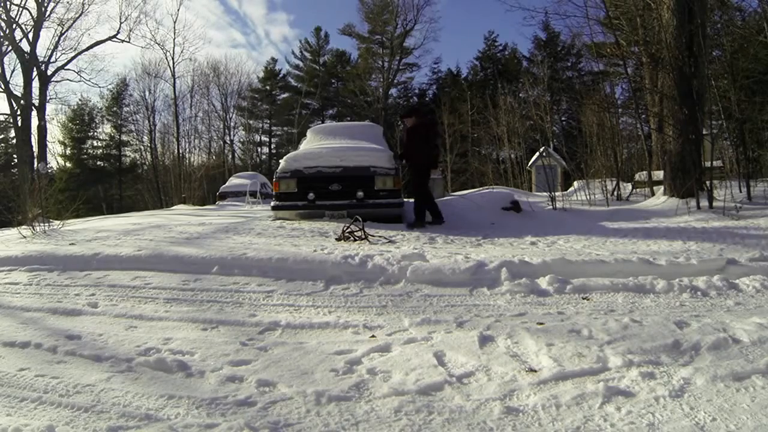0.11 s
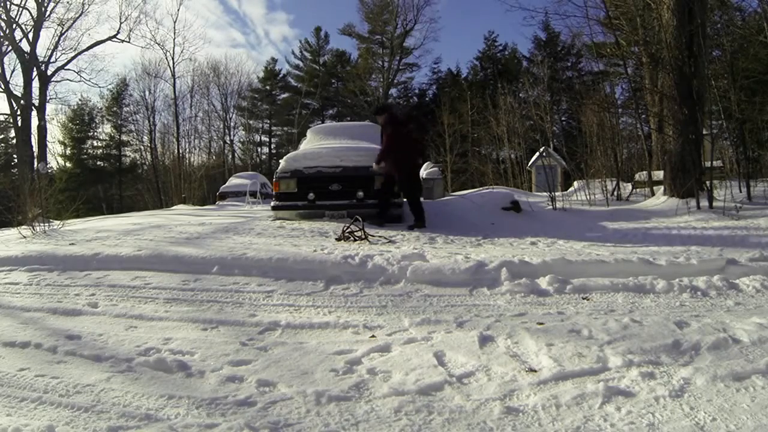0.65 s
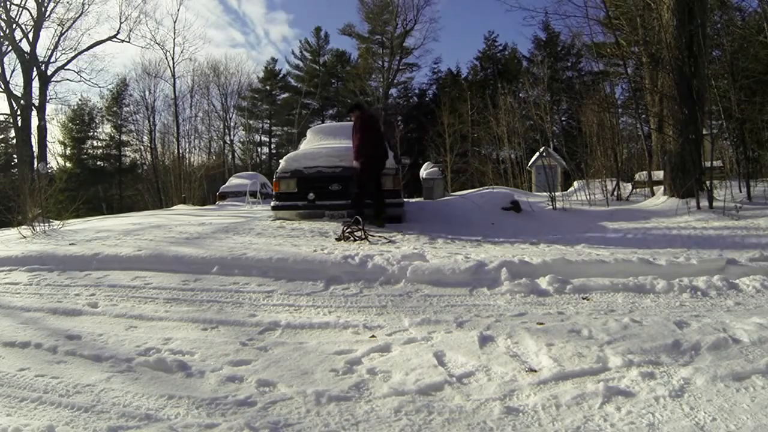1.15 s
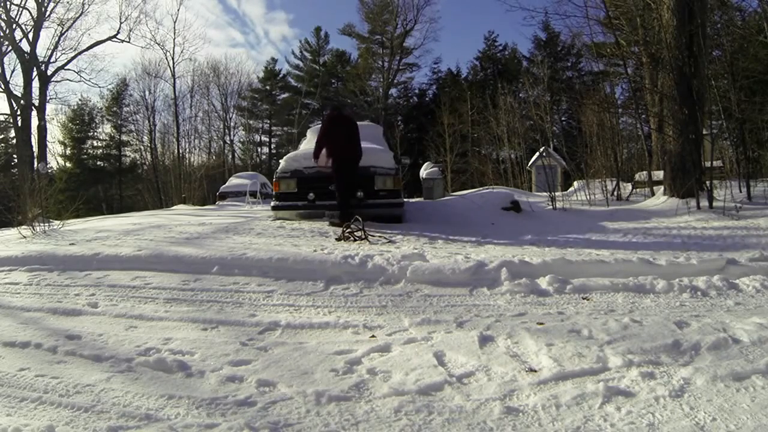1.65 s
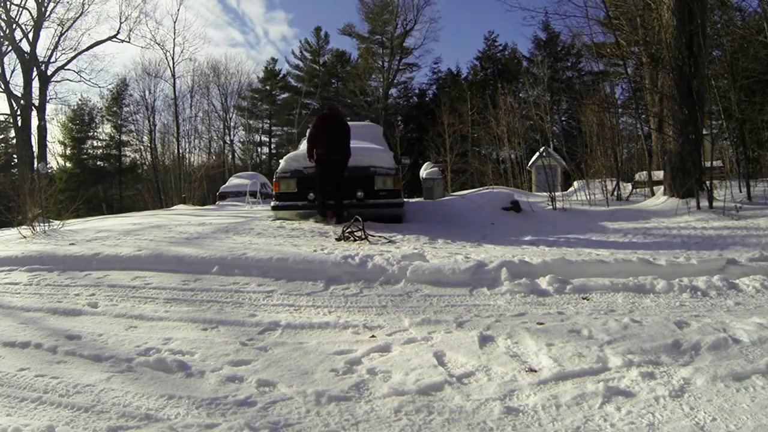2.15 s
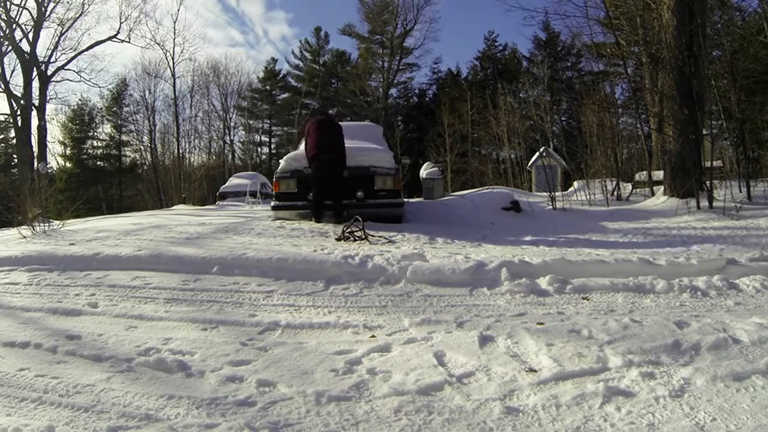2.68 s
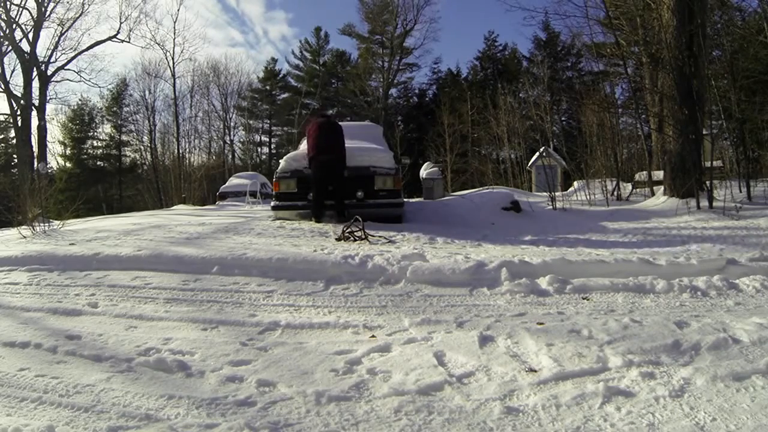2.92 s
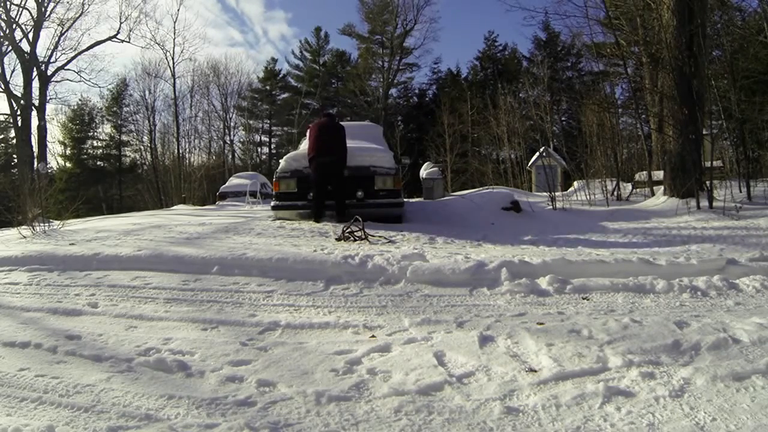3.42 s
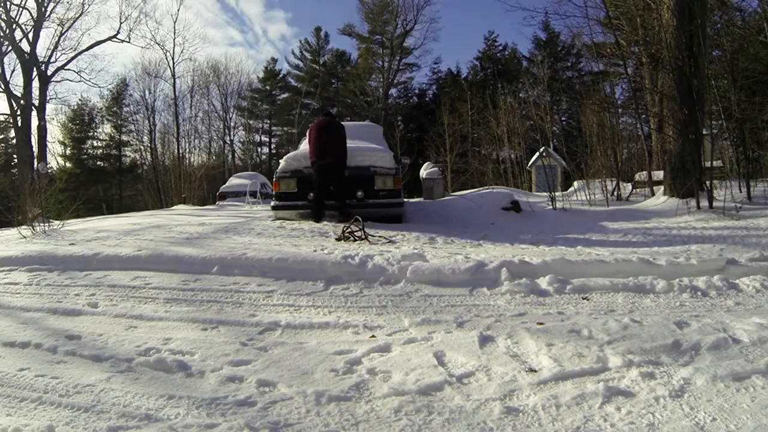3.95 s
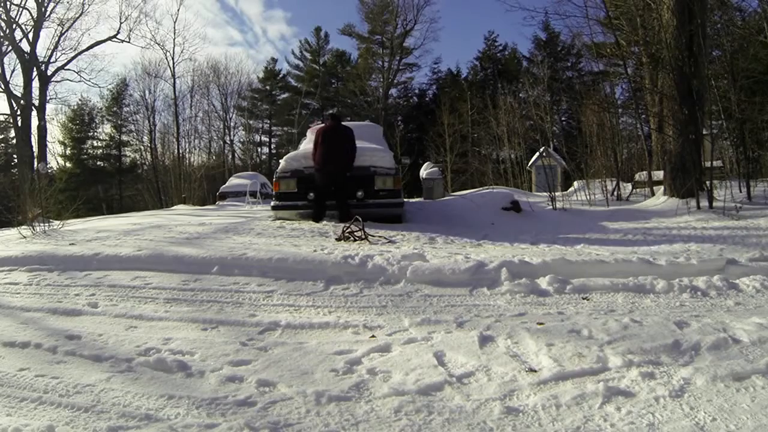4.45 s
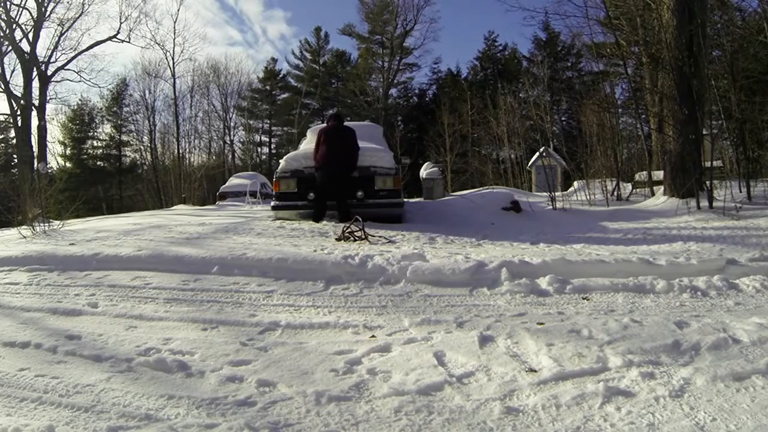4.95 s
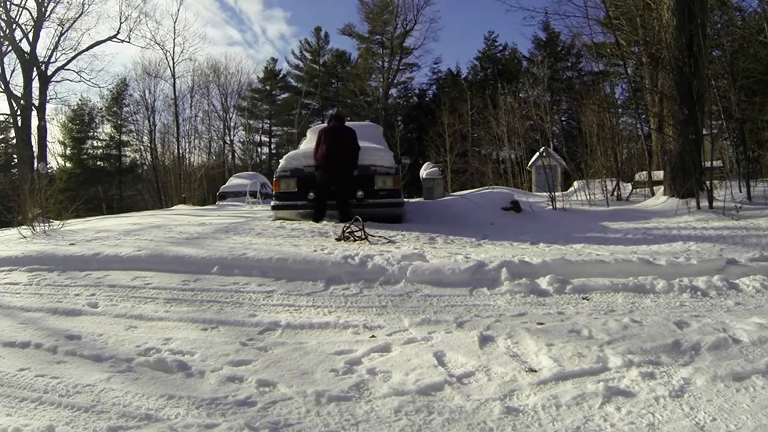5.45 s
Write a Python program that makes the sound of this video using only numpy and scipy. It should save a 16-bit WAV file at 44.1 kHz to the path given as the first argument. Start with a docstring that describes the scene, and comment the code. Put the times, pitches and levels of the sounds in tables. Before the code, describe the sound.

A quiet outdoor yard, dry and without echo, in mono. Light wind rumbles unsteadily on the microphone over soft hiss and a very faint high whine. From 0 to 0.9 s someone shuffles in cold snow, with grainy crunches, small muffled knocks and a soft metallic clink around 0.5 s. It nearly quiets at about 1 s, and soft steps resume around 1.3 s. At 1.7 s a sharp crust crack snaps out, followed by more brittle cracks at 2.0 and 2.2 s and a low footfall boom near 2.4 s. From 2.7 to 3.4 s the treading is densest, with creaky groaning and deep hollow thuds, strongest near 3.3 s. Another crunch spreads from 3.8 to 4.4 s, then a brief lull. Short crackling presses follow from 4.8 s, with a faint metal ring near 5.0 s. A heavy step at 5.45 s brings a low boom and tiny high squeak, its crunch continuing to the end as wind swells.

```python
"""Someone treads and shuffles in cold, dry snow across a quiet yard: crystals break in dense random showers.
The packed snow groans and thuds as slips and collapses ring a few hollow resonances; crusts crack
as bursts of splinters with a ring; two heavy footfalls boom as low sines and a sole squeaks once.
A carried metal thing rings faintly in decaying modes.
Light wind, shaped noise, rumbles on the microphone over its own hiss and a thin whine."""
import sys
import numpy as np
from scipy import signal
from scipy.fft import rfft, irfft
from scipy.io import wavfile
from scipy.ndimage import uniform_filter1d

SR = 44100
rng = np.random.default_rng(int(sys.argv[2]) if len(sys.argv) > 2 else 0)


def unload_wav(signal):
    """Save mono or channel-first audio to the path in sys.argv[1] as 16-bit WAV at rate SR, clipped to [-1, 1]."""
    wavfile.write(
        sys.argv[1],
        SR,
        np.round(np.clip(np.atleast_2d(signal).T, -1, 1) * 32767).astype(np.int16),
    )


def gain_from_decibels(decibels):
    """Convert decibel values to linear amplitude factors."""
    exponent = np.asarray(decibels, float) / 20
    return 10 ** exponent


N = 246519
T = np.arange(N) / SR

# spectrum of breaking crystals: (f/Hz, relative density/dB per Hz)
CRYSTAL_SPECTRUM = [(500, -7), (800, 0.5), (1400, -0.5), (3700, -6.5), (6200, -12.5), (9000, -19),
                    (12700, -21.5), (15000, -27.5)]
# snow underfoot along the way: (t/s, finest crystals over the coarse/dB,
# deep groan over the middle/dB, upper groan over the middle/dB)
SNOW_UNDERFOOT = [(0, -12, -4.5, -6.5), (0.4, -15, -1, -2.5), (0.63, -7.5, -3, 1), (0.75, -9, -4.5, -7.5),
                  (1.3, -12.5, -2.5, -3.5), (1.7, -7.5, 2, -7), (2.2, -11.5, 3.5, 0), (2.6, -8, 9, 1.5),
                  (3.1, -8.5, 9, 1), (3.4, -10.5, 7, 0.5), (3.7, -18, -3, -11), (3.9, -7.5, 4, -0.5),
                  (4.2, -9.5, 3, -3), (4.35, -10.5, -7, -11), (4.8, -7.5, -2, -2), (5.1, -11, 5, -2.5),
                  (5.587, -7.5, -2.5, -5)]


def curves(table):
    """Columns of a table after the time, interpolated at every sample."""
    s, *columns = np.transpose(table)
    return [np.interp(T, s, column) for column in columns]


def unit(x):
    """Scale to rms 1."""
    return x / np.sqrt(np.mean(x ** 2))


def colour(x, points):
    """Filter x by a curve of (f/Hz, gain/dB) points, joined on a log frequency axis, and scale to rms 1."""
    hz, db = np.transpose(points)
    f = np.maximum(np.arange(N // 2 + 1) * SR / N, 1)
    gain = gain_from_decibels(np.interp(np.log(f), np.log(hz), db))
    return unit(irfft(rfft(x) * gain, N))


def band(x, hz, width):
    """Two-pole resonance, gain 1 at the centre; width in Hz."""
    return signal.lfilter(*signal.iirpeak(hz, hz / width, fs=SR), x)


def fade(t, t60):
    """Decay by 60 dB in t60 seconds."""
    return np.exp(-np.log(1000) * t / t60)


def add(out, s, x):
    """Mix x into out from time s in seconds, cut at the end of the scene."""
    start = int(s * SR)
    out[start:start + len(x)] += x[:N - start]


def walk(rate):
    """Wandering control signal of rms 1: rate random targets a second, joined by straight slopes."""
    hold = int(SR / rate)
    targets = rng.standard_normal(N // hold + 1)
    return unit(uniform_filter1d(np.repeat(targets, hold), hold)[:N])


def grains(rate, spread_db):
    """Random clicks, rate a second on average; sizes spread exponentially in dB, so a few stand out."""
    when, size, sign = rng.random(N), rng.exponential(size=N), rng.choice([-1, 1], N)
    return (when < rate / SR) * sign * gain_from_decibels(spread_db * np.minimum(size, 4))


def microphone():
    """Wind rumble as low noise of varying level, steady hiss and a thin electric whine."""
    # wind on the microphone: (t/s, level/dB)
    wind_level = [(0, -56), (0.2, -55.5), (0.45, -64), (0.72, -54), (1.15, -68), (1.4, -55.5), (1.6, -64.5),
                  (1.85, -55.5), (2.22, -63), (2.47, -49), (2.62, -61), (2.9, -56), (3.28, -54),
                  (3.5, -64.5), (3.85, -60.5), (3.97, -50.5), (4.2, -52.5), (4.6, -66), (4.82, -56.5),
                  (5.15, -66), (5.5, -44), (5.587, -48)]
    # spectrum of the wind rumble: (f/Hz, relative density/dB per Hz)
    gust_spectrum = [(12, -33), (25, 4), (48, 0), (85, -1), (125, -4.5), (300, -87)]
    # spectrum of the hiss: (f/Hz, relative density/dB per Hz)
    hiss_spectrum = [(90, -28), (140, 5.5), (400, -4.5), (1200, -6.5), (4500, -15), (8000, -18),
                     (13000, -25), (15200, -24)]
    hiss_db = -65.5
    whine_hz, whine_db = 14745, -88
    wind = gain_from_decibels(curves(wind_level)[0]) * colour(rng.standard_normal(N), gust_spectrum)
    hiss = gain_from_decibels(hiss_db) * colour(rng.standard_normal(N), hiss_spectrum)
    whine = gain_from_decibels(whine_db) * np.sin(2 * np.pi * whine_hz * T)
    return wind + hiss + whine


def clinks():
    """Every soft knock rings the same metal modes, a little differently; the ring wavers as the thing swings."""
    # metal knocked: (t/s, base level of the modes/dB, extra on the lowest mode/dB)
    knocks = [(0.526, -42.5, 8), (0.9155, -58.5, -11), (4.9752, -46, 12)]
    # modes of the metal: (f/Hz, level relative to the knock/dB, t60/s)
    metal_modes = [(638, -10, 0.21), (1077, -13.5, 0.96), (1360, -15, 0.64), (1450, -17, 0.19),
                   (1505, -13, 0.48), (1520, -8, 0.51), (1760, -10, 0.53)]
    t, out = T[:SR], np.zeros(N)
    onset = np.minimum(t / 0.0026, 1)  # 2.6 ms ramp: the knock is soft
    scatter_db = 2.5 * rng.standard_normal((len(knocks), len(metal_modes)))
    for (s, db, low_db), scatter in zip(knocks, scatter_db):
        for k, (hz, mode_db, t60) in enumerate(metal_modes):
            gain = gain_from_decibels(db + mode_db + scatter[k] + low_db * (k == 0))
            add(out, s, gain * onset * np.sin(2 * np.pi * hz * t) * fade(t, t60))
    waver = gain_from_decibels(1.5 * walk(40))
    return out * waver


def squeak():
    """A short, near-pure whistle of the sole, throbbing as it sticks and slips."""
    centre_s, spread_s = 5.4645, 0.0096  # Gaussian swell
    whistle_hz, throb_hz = 4520, 31  # the throb is a sine multiplier, so the loudness peaks twice per cycle
    level_db = -31.5  # before swell and throb
    t = T - centre_s
    swell = np.exp(-.5 * (t / spread_s) ** 2)
    throb = np.sin(2 * np.pi * throb_hz * t)
    return gain_from_decibels(level_db) * swell * throb * np.sin(2 * np.pi * whistle_hz * t)


def stamp():
    """The ground booms under a heavy foot: a low, decaying sine."""
    # heavy footfalls: (t/s, starting level/dB, f/Hz, t60/s)
    footfalls = [(2.363, -33, 76.2, 0.34), (5.446, -34, 81.6, 0.2)]
    t, out = T[:SR], np.zeros(N)
    for s, db, hz, t60 in footfalls:
        add(out, s, gain_from_decibels(db) * np.sin(2 * np.pi * hz * t) * fade(t, t60))
    return out


def hollow(push):
    """The packed snow rings in three groups of resonances: deep, middle, upper."""
    # three groups of resonances, each a list of: (f/Hz, width/Hz, relative level/dB)
    hollow_groups = [
        [(207.6, 77, 1.5), (242.8, 27, -9.5)],
        [(404, 125, 7), (477, 126, -7)],
        [(655, 64.5, 9.5), (804, 116, 3)],
    ]
    rings = []
    for group in hollow_groups:
        ring = 0
        for hz, width, db in group:
            steep = band(band(push, hz, width), hz, width)  # two passes steepen the sides
            ring = ring + gain_from_decibels(db) * steep / np.sqrt(width)  # evens out wide and narrow resonances
        rings.append(ring)
    return rings


def thuds():
    """Sudden collapses of the packed snow strike its hollows with single blows."""
    # collapses: (t/s, deep peak/dB, middle peak/dB, upper peak/dB)
    collapses = [(0.08, -43, -34, -48), (0.143, -46, -39, -42), (0.202, -44, -34.5, -36),
                 (0.314, -59, -42.5, -50), (0.371, -57, -48, -44.5), (0.664, -50, -40, -47),
                 (0.719, -49, -42, -44), (0.833, -44, -39.5, -37), (0.846, -39, -36, -38.5),
                 (1.212, -59, -54, -63), (1.43, -55, -51, -48), (1.596, -58, -49, -40),
                 (1.662, -47, -50, -50), (1.772, -36.5, -47, -40), (1.838, -36, -46, -55),
                 (1.897, -42, -40, -64), (1.955, -42, -46, -53), (2.199, -61, -51, -38),
                 (2.329, -34.5, -43, -45), (2.418, -45, -41.5, -54), (2.542, -37, -44, -45.5),
                 (2.699, -32, -43, -50), (2.75, -33.5, -39.5, -46), (2.789, -37, -40, -56),
                 (2.831, -32.5, -41, -57), (3.045, -31, -40, -42), (3.077, -25.5, -36.5, -36),
                 (3.172, -33, -50, -34), (3.229, -44, -61, -31.5), (3.257, -22, -39, -35),
                 (3.277, -22.5, -54, -32.5), (3.371, -39, -38, -43), (3.462, -41, -45, -49),
                 (3.599, -45.5, -42, -57), (3.775, -46, -39, -54), (3.815, -43, -41.5, -49),
                 (3.844, -40, -45, -41), (3.943, -30.5, -55, -50), (3.964, -33.5, -47, -40.5),
                 (4.269, -38, -30.5, -40), (4.404, -56, -37, -45.5), (4.594, -50.5, -52, -60),
                 (4.693, -48.5, -47, -54), (4.786, -52, -35, -50), (5.224, -58, -42, -63.5)]
    blow = np.zeros(SR // 8)
    blow[0] = 1
    rings = np.array([ring / np.abs(ring).max() for ring in hollow(blow)])
    out = np.zeros(N)
    for s, *db in collapses:
        add(out, s, gain_from_decibels(np.array(db)) @ rings)
    return out


def cracks():
    """The crust cracks in a burst of splinters; the breaking slab rings at its own pitch."""
    # crust cracking: (t/s, nominal peak of the splinters/dB, pitch of the ring/Hz, ring over splinters/dB)
    crust_breaks = [(0.2118, -33, 960, 5), (0.377, -36, 1180, -7), (0.4292, -33.5, 802, -3),
                    (0.522, -41, 1450, 3), (0.623, -36.5, 840, 7), (0.704, -38, 830, 7),
                    (0.838, -34, 800, -9), (1.6516, -45, 1450, -15), (1.731, -16.5, 2040, -9),
                    (1.7675, -23, 900, -3), (1.902, -40, 834, -10), (2.0312, -23, 1023, 1),
                    (2.204, -19, 1030, -7), (2.269, -30, 3700, -2), (2.318, -33.5, 1460, 11),
                    (2.3594, -23, 1570, 6), (2.541, -41, 780, -3), (2.624, -41.5, 810, 9),
                    (2.8724, -21, 876, 6), (2.937, -33.5, 1040, 2), (3.048, -25.5, 780, 2),
                    (3.2786, -29, 960, -1), (3.3722, -25.5, 975, -3), (3.7776, -37, 845, -6),
                    (3.8469, -22, 820, 3), (4.292, -29.5, 2880, 5), (4.31, -36, 1450, 13),
                    (4.331, -38, 1455, 13), (4.351, -37, 1450, 11), (4.782, -35, 1450, -15),
                    (4.859, -37.5, 3350, 9.5), (4.872, -40, 1490, 10), (4.8854, -39, 1490, 10),
                    (4.954, -35, 1450, -10), (4.9773, -40, 1450, -8), (5.0517, -36, 1410, -12),
                    (5.0751, -42, 1440, 13), (5.4894, -31, 1060, 6)]
    crest_db = 14.5  # how far the peak of a burst of splinters stands above its rms
    t60_s = 0.077
    t, out = T[:SR // 8], np.zeros(N)
    splinters = colour(grains(12000, 2.8), CRYSTAL_SPECTRUM)
    for s, db, hz, ring_db in crust_breaks:
        burst = splinters[int(s * SR):][:len(t)]
        width = 0.073 * hz
        ring = unit(band(band(burst, hz, width), hz, width))
        burst = burst + gain_from_decibels(ring_db) * ring
        add(out, s, gain_from_decibels(db - crest_db) * burst * fade(t[:len(burst)], t60_s))
    return out


def groan(middle_db):
    """Irregular slips, in bursts, ring the hollows of the packed snow."""
    bursts = gain_from_decibels(2.2 * walk(35))
    slips = grains(1200, 3.7) * bursts
    deep, middle, upper = [unit(ring) for ring in hollow(slips)]
    deep_db, upper_db = curves(SNOW_UNDERFOOT)[1:]
    return gain_from_decibels(middle_db) * (gain_from_decibels(deep_db) * deep + middle + gain_from_decibels(upper_db) * upper)


def crunch(coarse_db):
    """Showers of breaking crystals in clumps, with a few lone snaps; the finest crystals carry the treble."""
    # faint rings of the crust: (f/Hz, width/Hz, mid level of its wandering gain/dB)
    crust_rings = [(1460, 90, -1), (2960, 140, -4), (3770, 140, -4)]
    usual_db, fine_per_db = -45, -0.05  # presses louder than usual are slightly duller
    fine_db = coarse_db + curves(SNOW_UNDERFOOT)[0] + fine_per_db * (coarse_db - usual_db)
    snaps = gain_from_decibels(-7.0) * unit(grains(250, 2.9))
    clumps = gain_from_decibels(1.8 * walk(60))
    shower = colour((unit(grains(7000, 3.04)) + snaps) * clumps, CRYSTAL_SPECTRUM)
    # each ring of the crust wakes now and then
    rings = sum(gain_from_decibels(db + 4 * walk(30)) * band(shower, hz, width) for hz, width, db in crust_rings)
    shower = shower + rings
    coarse = signal.filtfilt(*signal.butter(2, 5600, fs=SR), shower)
    fine = shower - coarse
    return gain_from_decibels(coarse_db) * unit(coarse) + gain_from_decibels(fine_db) * unit(fine)


def presses():
    """Crunch and groan levels in dB: every press swells and dies by one law; overlaps add in power."""
    # each press of a sole: (fullest at t/s, rise/s, fall/s, crunch level/dB, groan level/dB);
    # rise and fall each span 20 dB
    sole_presses = [(0.096, 0.18, 0.18, -50, -44.5), (0.215, 0.018, 0.088, -55.5, -55),
                    (0.26, .02, 0.035, -60, -52.5), (0.322, 0.023, 0.034, -59.5, -55),
                    (0.383, 0.018, 0.056, -53, -53.5), (0.44, .02, 0.15, -52, -52),
                    (0.526, 0.064, 0.066, -56.5, -61), (0.63, 0.11, 0.089, -55, -55),
                    (0.7, 0.11, 0.28, -57.5, -50), (0.842, .012, 0.1, -57, -58),
                    (0.92, 0.065, 0.12, -65, -74.5), (1.281, 0.032, 0.15, -58.5, -50.5),
                    (1.37, 0.14, 0.095, -56.5, -47.5), (1.533, 0.075, 0.065, -62.5, -74),
                    (1.603, 0.011, 0.042, -60.5, -59), (1.656, 0.022, 0.13, -48, -50),
                    (1.736, 0.018, 0.24, -49, -51.5), (1.905, 0.017, 0.12, -57.5, -52.5),
                    (2.034, 0.02, 0.12, -54.5, -52.5), (2.204, 0.011, .17, -46, -47),
                    (2.28, 0.068, 0.13, -55, -59), (2.371, 0.037, 0.12, -50.5, -54),
                    (2.549, 0.011, 0.029, -61, -59), (2.634, 0.02, 0.13, -57.5, -57),
                    (2.77, .18, 0.18, -49.5, -52), (2.873, 0.015, 0.068, -46, -55.5),
                    (2.97, 0.04, 0.086, -50.5, -49), (3.06, 0.13, 0.12, -47, -47.5),
                    (3.185, 0.024, 0.029, -53.5, -48), (3.293, 0.096, .1, -43.5, -45.5),
                    (3.384, 0.097, 0.052, -46.5, -47.5), (3.471, 0.073, 0.026, -59, -53.5),
                    (3.604, 0.035, 0.085, -58, -53.5), (3.676, .07, 0.026, -55, -59),
                    (3.784, 0.014, 0.083, -57.5, -51.5), (3.855, 0.011, .12, -45, -48.5),
                    (3.97, 0.17, 0.42, -46.5, -48), (4.2, 0.13, 0.17, -51.5, -50.5),
                    (4.298, 0.042, 0.098, -47, -54), (4.416, 0.05, 0.14, -54, -53),
                    (4.6, .02, .04, -67, -65), (4.706, 0.02, 0.061, -60.5, -62),
                    (4.794, .03, .06, -47.5, -50.5), (4.864, 0.027, 0.11, -49.5, -55),
                    (4.96, .012, .03, -55.5, -60), (4.982, .012, 0.067, -48, -56.5),
                    (5.063, 0.022, 0.095, -50, -68), (5.22, 0.021, 0.078, -51.5, -53.5),
                    (5.319, 0.042, 0.095, -51.5, -58), (5.469, 0.18, 0.52, -44.5, -47.5)]
    rise_curve, fall_curve = 1.36, 1.54  # powers: the level lingers near the top, then drops faster
    power = np.full((2, N), 1e-12)
    for s, rise, fall, *db in sole_presses:
        early = np.maximum(s - T, 0) / rise
        late = np.maximum(T - s, 0) / fall
        swell = gain_from_decibels(-20 * (early ** rise_curve + late ** fall_curve))
        power = power + np.outer(gain_from_decibels(np.array(db)) ** 2, swell ** 2)
    return 10 * np.log10(power)


def scene():
    """All sources, dry in the open air, on one channel."""
    crunch_db, groan_db = presses()
    background = microphone() + clinks()
    feet = squeak() + stamp() + thuds() + cracks()
    snow = groan(groan_db) + crunch(crunch_db)
    return (background + feet + snow)[None]


def band_limit(x):
    """A steep low-pass at the top of the band."""
    return signal.sosfilt(signal.butter(12, 16470, fs=SR, output="sos"), x)


def record(dry):
    """The camera cuts the top with a steep low-pass at 15350 Hz."""
    low_pass = signal.ellip(8, .2, 40, 15350, fs=SR, output="sos")  # 0.2 dB ripple, 40 dB stopband
    mix = signal.sosfilt(low_pass, dry)
    return band_limit(mix)


dry = scene()
out = record(dry)
unload_wav(out)
```